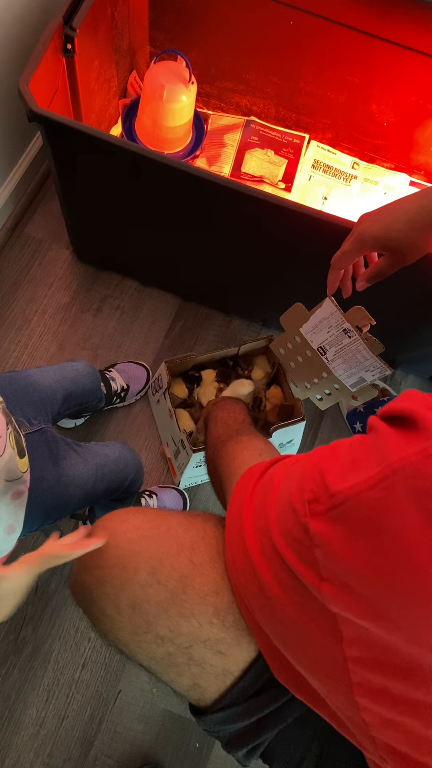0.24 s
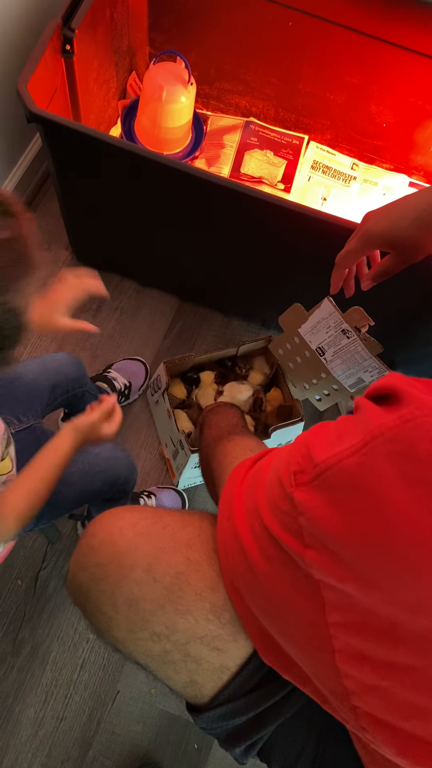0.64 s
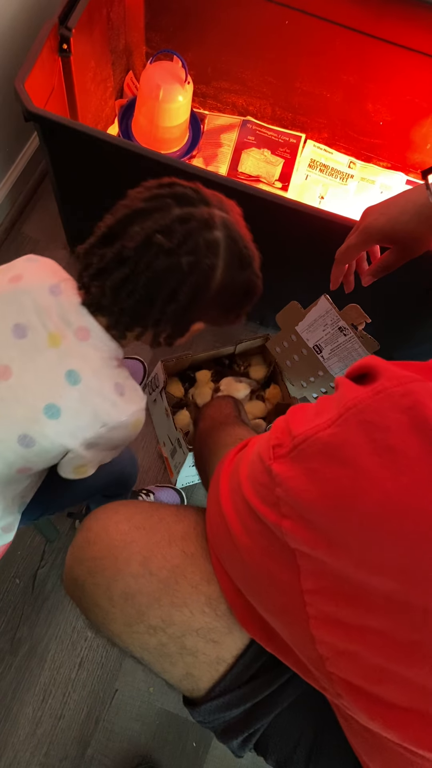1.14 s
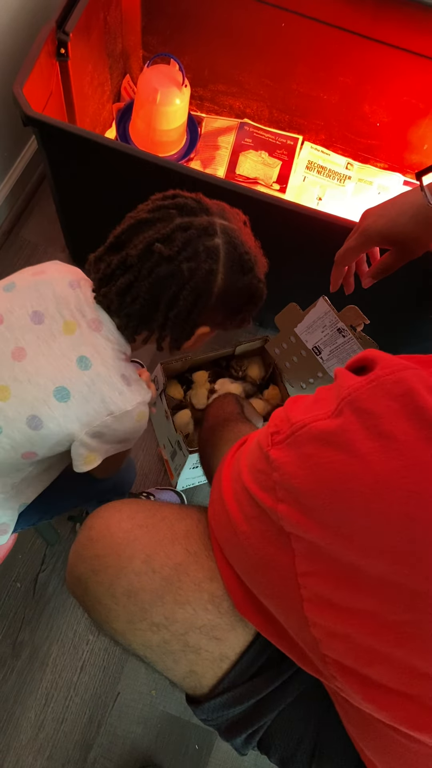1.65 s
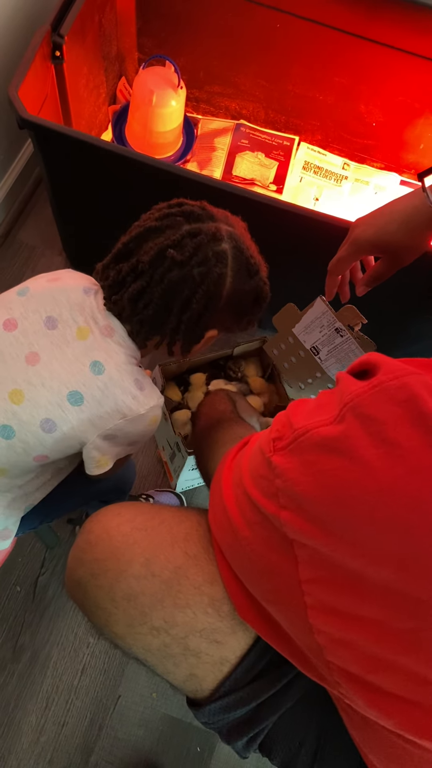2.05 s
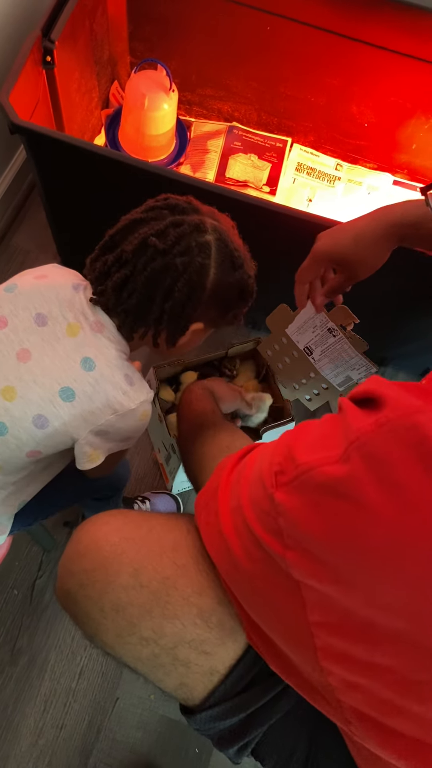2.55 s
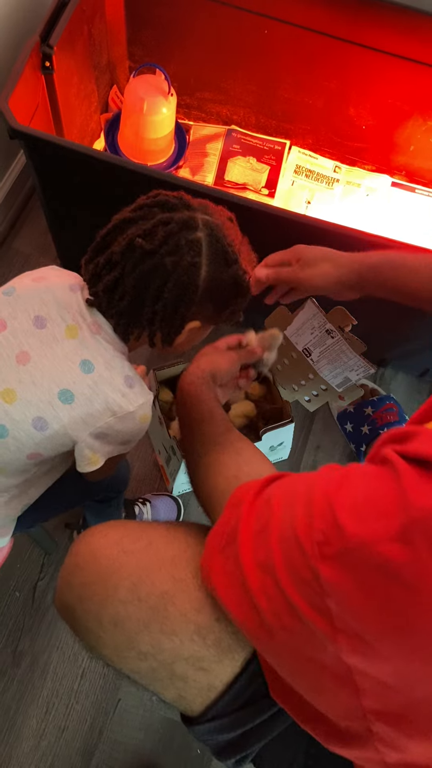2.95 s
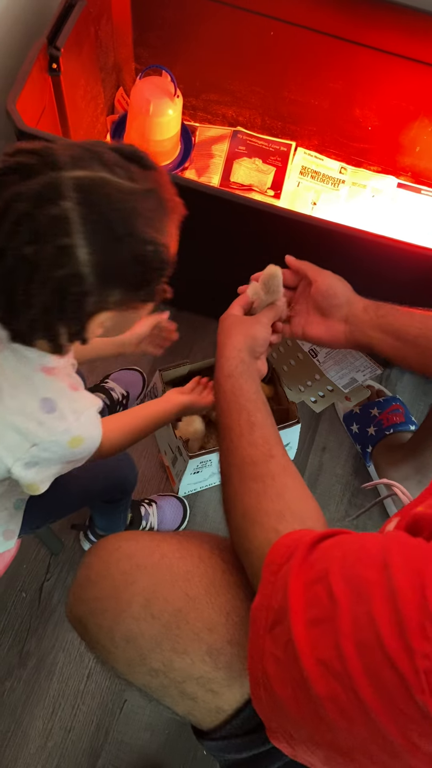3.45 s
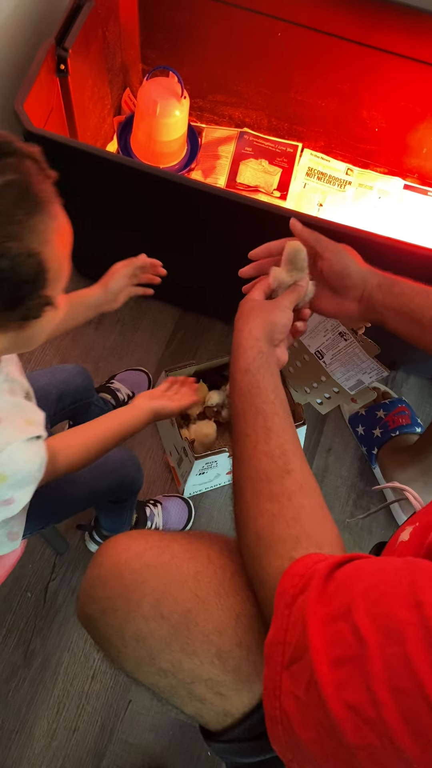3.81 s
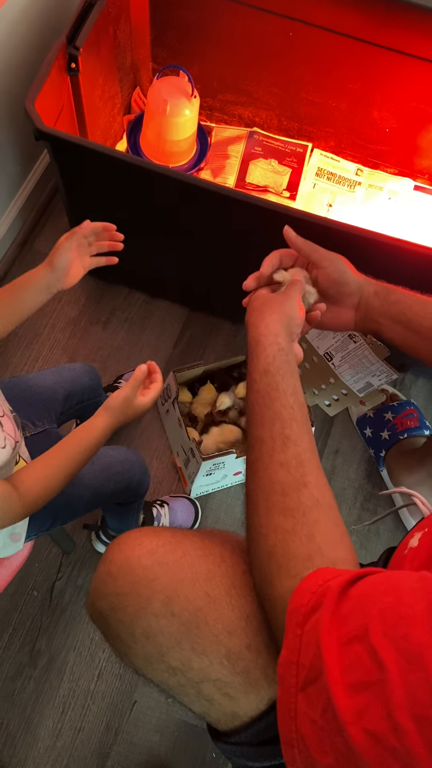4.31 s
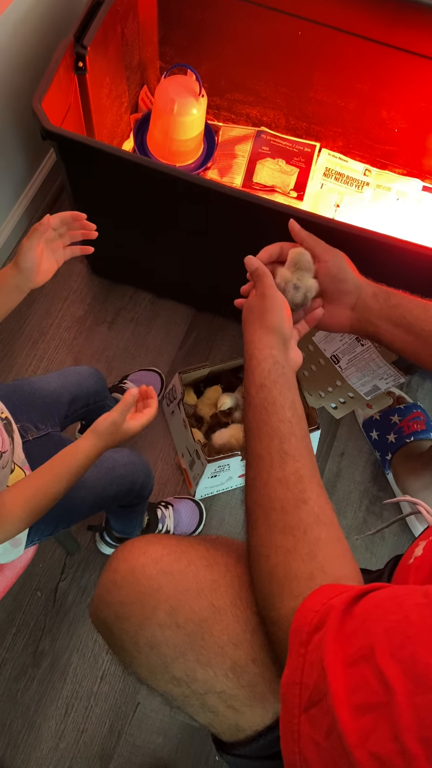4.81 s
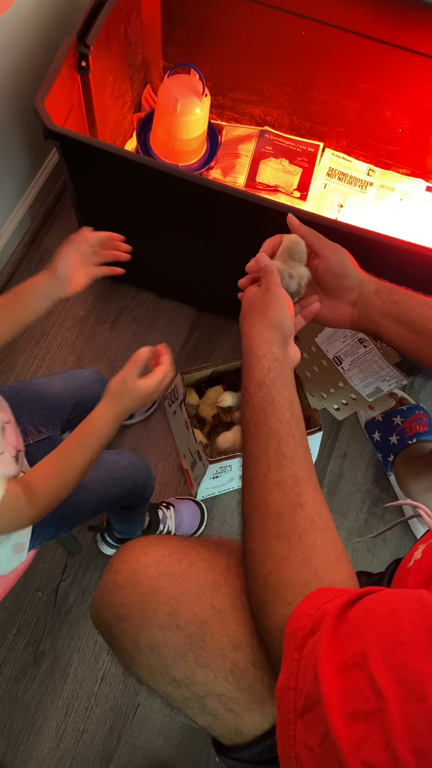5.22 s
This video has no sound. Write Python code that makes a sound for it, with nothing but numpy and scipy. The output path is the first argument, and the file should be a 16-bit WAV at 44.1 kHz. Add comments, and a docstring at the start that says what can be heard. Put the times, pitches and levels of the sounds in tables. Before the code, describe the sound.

Close, shrill chick cheeps slide downward over softer overlapping peeps, with cardboard knocks, rustling bedding and low floor bumps in a small room.

```python
"""Day-old chicks peep in a cardboard box in a small room; one cries loudest, with another close behind it.
Each peep is a nearly pure whistle sliding down; the cries first arch, then break into a reedy low voice.
Echoes of the box and a noise tail of the room surround the chicks. Shaped noise makes a rummaging hand,
crackling bedding, knocks, claw ticks, shifting weight and moving air; sine waves make an appliance's faint hum."""
import sys
import numpy as np
from scipy import signal
from scipy.fft import rfft, irfft, next_fast_len
from scipy.io import wavfile

SR = 44100
rng = np.random.default_rng(int(sys.argv[2]) if len(sys.argv) > 2 else 0)


def int16_out(signal):
    """Quantize to a 16-bit WAV file."""
    q = np.round(np.clip(np.atleast_2d(signal).T, -1, 1) * 32767)
    wavfile.write(sys.argv[1], SR, q.astype(np.int16))


N = 241182
TIME = np.arange(N) / SR


def from_db(db):
    """Turn decibels into a gain."""
    return 10 ** (np.asarray(db) / 20)


def rms_one(x):
    """Scale to unit power."""
    return x / np.sqrt(np.mean(x ** 2) + 1e-20)


def coloured(x, spectrum):
    """Filter by a curve of (f/Hz, level/dB) points joined along a logarithmic pitch axis."""
    hz, db = np.transpose(spectrum)
    # spare room at the end keeps the filter's ringing from wrapping round to the start
    size = next_fast_len(N + 8192)
    bins = np.maximum(np.fft.rfftfreq(size, 1 / SR), 1)
    gain = from_db(np.interp(np.log(bins), np.log(hz), db))
    return irfft(rfft(x, size) * gain, size)[..., :N]


def noise(spectrum, side_db):
    """Stereo noise of a given colour and unit power; a higher side level sounds wider."""
    mid, side = rng.standard_normal((2, N))
    left_right = mid + from_db(side_db) * side * [[1], [-1]]
    return rms_one(coloured(left_right, spectrum))


def waver(t, rate):
    """Random motion: straight lines between normal random points, rate of them per second."""
    knots = rng.standard_normal(1024)
    return np.interp((t - t[0]) * rate, np.arange(len(knots)), knots)


def progress(t, start_s, length_s):
    """Go from 0 to 1 over a stretch of time."""
    return np.clip((t - start_s) / length_s, 0, 1)


def swell(middle_s, length_s):
    """A bell-shaped rise and fall of gain."""
    return np.exp(-(2 * (TIME - middle_s) / length_s) ** 2)


def add(track, start_s, sound):
    """Mix a sound in at its time."""
    at = int(np.clip(start_s * SR, 0, N))
    track[at:at + len(sound)] += sound[:N - at]


def still_room(air_db=-64):
    """Moving air is soft noise; the appliance hum is a few sine waves with unsteady phase."""
    # colour of the air: f/Hz, level/dB per Hz
    air_colour = [(30, -10), (100, -1), (300, 0), (600, -11.5), (1200, -41.5), (3000, -18.5), (10000, -56),
                  (15000, -49.5)]
    # tones of the hum: f/Hz, level/dB rms
    hum_tones = [(293, -78), (335.4, -64.5), (473, -79)]
    hum = np.zeros(N)
    for hz, db in hum_tones:
        phase = 2 * np.pi * hz * TIME + 0.58 * waver(TIME, 6.6)
        hum += from_db(db) * np.sqrt(2) * np.sin(phase)
    return hum + from_db(air_db) * noise(air_colour, side_db=-4.0)


def bedding(trim_db=-1.0, grain_db=4.5):
    """Many small feet keep bedding and cardboard crackling: noise with fast random loudness."""
    # loudness before the trim: t/s, level/dB
    crackle_level = [(0, -69.5), (.55, -87), (.9, -73.5), (1.8, -72.5), (2.1, -62), (2.4, -63), (2.55, -82),
                     (3.0, -63), (3.5, -75.5), (3.82, -61.5), (3.97, -77), (4.5, -108), (5.1, -76),
                     (5.47, -60.5)]
    # colour: f/Hz, level/dB per Hz
    crackle_colour = [(1000, -24), (3000, 7.5), (9000, -2.5), (12000, -2), (15000, -11)]
    db = np.interp(TIME, *np.transpose(crackle_level)) + trim_db
    grain = grain_db * waver(TIME, 110)
    return from_db(db + grain) * noise(crackle_colour, side_db=-2.5)


def movement(grain_db=4.0, lump_db=2.5):
    """The floor booms under shifting weight; a hand brushes cardboard, which sticks and slips."""
    # weight shifting on the floor, as its rumble: t/s, level/dB
    shifting = [(0, -64.5), (.68, -65), (.75, -43), (.97, -51.5), (1.07, -51.5), (1.45, -56.5), (1.54, -47),
                (1.87, -57), (2.04, -37.5), (2.14, -46), (2.5, -54), (3.2, -59), (3.48, -69), (3.6, -59.5),
                (3.95, -63), (4.69, -66.5), (4.77, -51.5), (5.01, -49), (5.2, -52.5), (5.47, -52)]
    # strokes of the hand: middle t/s, length/s, hollow body level/dB, scrape level/dB
    strokes = [(0.412, 0.11, -63.5, -59.5), (1.124, 0.082, -49.5, -57.5), (1.473, 0.061, -51, -59.5),
               (1.627, 0.22, -48.5, -62.5), (1.755, 0.082, -63, -47.5), (1.846, 0.07, -58, -49.5),
               (2.18, 0.1, -74, -58.5), (2.419, .04, -71.5, -58), (2.875, .06, -59, -77),
               (3.05, 0.3, -79, -59.5), (3.741, 0.029, -70, -57), (3.848, 0.093, -72, -56.5),
               (4.728, 0.038, -56.5, -81), (4.852, 0.068, -51, -69), (5.266, 0.17, -62, -57.5),
               (5.333, 0.063, -48, -82), (5.46, .06, -70, -56.5)]
    # colours of floor rumble, dull shuffle and bright scrape: f/Hz, level/dB per Hz
    rumble_colour = [(20, -15), (35, -14.5), (48, -2.5), (59, 7.5), (80, -7), (120, -16.5), (250, -68)]
    shuffle_colour = [(70, -0.5), (130, 9.5), (300, 7.5), (450, -2), (700, -11), (1200, -71)]
    scrape_colour = [(350, -12.5), (750, 1), (1050, -5), (1500, -8), (2200, -13), (6000, 2.5),
                     (10000, -38.5), (15000, -17)]
    rumble_db = np.interp(TIME, *np.transpose(shifting))
    # clothes and box follow part of the rumble's rise and fall around -55 dB
    effort_db = rumble_db + 55
    shuffle = from_db(-62.5 + 0.41 * effort_db)
    scrape = from_db(-69 + 0.25 * effort_db)
    for middle_s, length_s, body_db, scrape_db in strokes:
        stroke = swell(middle_s, length_s)
        # add as powers, since the noises are random
        shuffle = np.hypot(shuffle, from_db(body_db) * stroke)
        scrape = np.hypot(scrape, from_db(scrape_db) * stroke)
    slips = from_db(grain_db * waver(TIME, 140))
    lumps = from_db(lump_db * waver(TIME, 55))
    out = from_db(rumble_db) * noise(rumble_colour, side_db=-70.5)
    out += shuffle * lumps * noise(shuffle_colour, side_db=-25.0)
    return out + scrape * slips * noise(scrape_colour, side_db=3.0)


def rub(middle_s=2.634, length_s=0.24, level_db=-60.5):
    """Something slides briefly over hollow cardboard: noise around the cardboard's resonance."""
    # resonance: f/Hz, level/dB per Hz
    rub_colour = [(400, -32), (520, -6.5), (630, -4), (720, -12), (950, -51)]
    return from_db(level_db) * swell(middle_s, length_s) * noise(rub_colour, side_db=-1.5)


def knocks(attack_s=0.0023, boom_db=-2, thud_db=-7, boom_width_hz=45):
    """Each soft blow is a broad thud and a damped boom of cardboard or floorboard."""
    # blows: t/s, level/dB before the thud and boom shares, time to fade by 60 dB/s, boom f/Hz
    blows = [(0.641, -56, 0.41, 140), (.725, -61, 0.26, 109), (1.116, -48.5, 0.82, 164),
             (1.537, -53, 1, 322), (1.702, -43, 0.99, 315), (1.793, -37.5, 0.27, 264),
             (1.965, -52.5, 0.95, 174), (2.22, -52, 0.23, 145), (4.815, -60, 0.54, 205),
             (5.307, -43.5, 0.463, 173)]
    # colour of the thud: f/Hz, level/dB per Hz
    thud_colour = [(40, -15), (70, 8), (170, 15.5), (280, 6.5), (500, 3.5), (900, -64), (2000, -96),
                   (5000, -32)]
    thud = from_db(thud_db) * noise(thud_colour, side_db=-18.5)
    out = np.zeros((2, N))
    for start_s, db, t60, hz in blows:
        age = np.maximum(TIME - start_s, 0)
        resonance = signal.iirpeak(hz, hz / boom_width_hz, fs=SR)
        boom = from_db(boom_db) * rms_one(signal.lfilter(*resonance, rng.standard_normal(N)))
        envelope = from_db(db - 60 * age / t60) * np.minimum(age / attack_s, 1)
        out += envelope * (thud + boom)
    return out


def ticks(trim_db=-7, t60=0.0043):
    """Claws tick dryly on cardboard: tiny bright snaps of noise that die within milliseconds."""
    # snaps: t/s, level/dB before the trim and filter
    snaps = [(0.9745, -40), (1.703, -34), (1.7259, -36), (3.8028, -31.5), (4.9903, -37), (5.3377, -47)]
    out, t = np.zeros(N), TIME[:2048]
    for start_s, db in snaps:
        add(out, start_s, from_db(db + trim_db - 60 * t / t60) * rng.standard_normal(len(t)))
    keep_treble = signal.butter(2, 1500, "high", fs=SR, output="sos")
    return signal.sosfilt(keep_treble, out)


def whistle(hz, level_db, reed_db, rasp, attack_s=0.0043, release_s=0.0047, jitter=0.0028,
            flutter_db=2.5, reedy_hz=3560, reedy_width_hz=110, rasp_hz=500):
    """A near sine from the syrinx (a bird's voice organ) that turns reedy in the low register."""
    # multiple of the pitch, level/dB in the pure high register, level/dB in the reedy low one
    overtones = [(2, -36, -7), (3, -37.5, -31.5), (4, -64, -37.5)]
    t = TIME[:len(hz)]
    hz = hz * (1 + jitter * waver(t, 304.0))
    phase = 2 * np.pi * np.cumsum(hz) / SR
    # 0 well above reedy_hz, 1 well below it
    reedy = .5 + .5 * np.tanh((reedy_hz - hz) / (2 * reedy_width_hz))
    tone = np.sin(phase)
    for order, pure_db, reedy_db in overtones:
        overtone_db = reed_db + pure_db + reedy * (reedy_db - pure_db)
        # leave out what lies above the highest pitch the sample rate can hold
        tone = tone + from_db(overtone_db) * np.sin(order * phase) * (order * hz < SR / 2)
    # a strained membrane also flaps slowly, which puts faint side tones beside the whistle
    flap_hz = rasp_hz * (1 + 0.175 * waver(t, 397))
    tone *= 1 + rasp * np.sin(2 * np.pi * np.cumsum(flap_hz) / SR)
    gate = np.clip(t / attack_s, 0, 1) * np.clip((t[-1] - t) / release_s, 0, 1)
    loudness = np.sqrt(2) * from_db(level_db + flutter_db * waver(t, 148.9))
    return loudness * np.sin(gate * np.pi / 2) ** 2 * tone


def peep(length_s, first_hz, last_hz, db, bend, reed_db, crest_share=0.54, sag_db=6):
    """One soft downward whistle; with bend above 0 its pitch falls ever faster."""
    u = np.linspace(0, 1, int(length_s * SR))
    hz = first_hz + (last_hz - first_hz) * u * (1 - bend * (1 - u))
    # loudest part of the way down, weaker by sag_db half a length from there
    level_db = db - sag_db * (2 * (u - crest_share)) ** 2
    return whistle(hz, level_db, reed_db, rasp=0.016)


def flock(level_db=-63, base_hz=4200, base_length_s=0.16, last_share=.65, bend=0.98, reed_db=3, count=64):
    """Faint falling peeps from deep in the huddle, one at a random moment of each equal time slot."""
    out = np.zeros(N)
    slot_s = N / SR / count
    for k, (when, high, long) in enumerate(rng.random((count, 3))):
        hz = base_hz * (.82 + 0.65 * high)
        length_s = base_length_s * (.8 + .5 * long)
        add(out, (k + when) * slot_s, peep(length_s, hz, last_share * hz, level_db, bend, reed_db))
    return out


def peeps(reed_db=-6):
    """The nearer chicks of the flock give soft falling whistles among the cries."""
    # start t/s, length/s, first f/Hz, last f/Hz, level/dB, bend (0 = straight, 1 = starts level)
    soft_peeps = [(0.01, 0.097, 5120, 4030, -61.5, 0.66), (0.016, 0.043, 4890, 3370.0, -62, 0.5),
                  (0.149, 0.1, 5780, 4100, -55, 0.79), (0.163, 0.088, 4730, 3400, -62, 0.6),
                  (0.21, 0.092, 4710, 2830, -47.5, 0.67), (0.283, 0.14, 4234, 2875, -52.5, 1),
                  (0.605, 0.12, 5690, 3930, -51, 0.93), (0.633, 0.082, 4650.0, 2680, -53.5, 0.59),
                  (0.688, 0.088, 4480.0, 2378, -44, 0.49), (0.71, 0.07, 4480.0, 3140, -52, 0.8),
                  (0.953, 0.078, 5830, 4600.0, -51.5, 0.7), (1.014, 0.071, 4780.0, 2855, -42.5, 0.77),
                  (1.096, 0.068, 3650.0, 2890, -61.5, 0.6), (1.098, 0.11, 4576, 3010, -55, 0.43),
                  (1.172, 0.089, 5640, 4700, -58.0, 0.69), (1.249, 0.061, 5670, 4380.0, -52, 0.39),
                  (1.381, 0.039, 5620, 4336, -45.5, 0.13), (1.405, 0.094, 4605, 2995, -46.0, 1.0),
                  (1.488, 0.11, 3910, 2986, -57.5, 0.4), (1.547, 0.1086, 5050, 4178, -55.5, 0.93),
                  (1.608, 0.032, 3520.0, 2750, -50, 0.31), (1.621, 0.064, 4510, 2830.0, -48.5, 0.52),
                  (1.962, 0.12, 3875, 3410, -59, 0.3), (2.068, 0.079, 3596, 2380, -51, 0.89),
                  (2.099, 0.079, 4700.0, 4220, -60.5, 0.6), (2.37, 0.11, 4000, 2756, -52.5, 0.89),
                  (2.429, 0.044, 4500, 3150, -53.5, 0.5), (2.483, 0.079, 3570, 2240, -48, 0.85),
                  (2.492, 0.11, 4650.0, 3820, -56.5, 0.6), (2.82, 0.085, 3787, 2470, -48, 0.91),
                  (2.899, 0.077, 4280.0, 2600.0, -56.5, 0.6), (2.939, 0.045, 4510, 2880, -49.5, 1),
                  (3.038, 0.027, 4270, 3630.0, -49, 0.6), (3.152, 0.11, 3730, 2750.0, -48.5, 0.7),
                  (3.239, 0.048, 4380.0, 2690, -53.0, 0.48), (3.279, 0.066, 4140, 2729, -59.5, 0.71),
                  (3.404, 0.037, 3450.0, 2540, -54, 0.7), (3.519, 0.069, 3912, 2390, -46.5, 0.747),
                  (3.622, 0.0783, 4175, 2540.0, -46, 0.27), (3.67, 0.069, 3569, 2400.0, -47.5, 0.66),
                  (3.937, 0.043, 3480.0, 2455, -47, 0.6), (3.979, 0.081, 4380.0, 2830.0, -54.0, 0.85),
                  (4.09, 0.062, 3564, 2305, -48.5, 0.53), (4.126, 0.064, 3760, 3200, -52, 0.6),
                  (4.185, 0.052, 4180, 2790, -46.5, 0.6), (4.391, 0.11, 4410, 2860, -59, 0.5),
                  (4.458, 0.097, 4440, 2900, -53, 0.79), (4.69, 0.059, 3860, 2590, -43.5, 0.502),
                  (4.737, 0.083, 4340, 3170, -51, 0.9), (4.829, 0.06, 4070, 2680, -58, 0.82),
                  (4.941, 0.051, 3780, 2240.0, -47, 0.94), (5.098, 0.056, 4075, 2487, -42, 0.4),
                  (5.157, 0.046, 3950.0, 2910, -51, 1)]
    out = np.zeros(N)
    for start_s, length_s, first_hz, last_hz, db, bend in soft_peeps:
        add(out, start_s, peep(length_s, first_hz, last_hz, db, bend, reed_db))
    return out


def cries(rasp=0.14):
    """Each distress cheep swells over an arch of pitch, breaks into the low register and fades sliding down."""
    # start t/s, arch length/s, fall length/s, top f/Hz, f/Hz before the break, f/Hz after it, last f/Hz,
    # arch level/dB, fall level/dB, overtone boost/dB, rising share of the arch (0-1),
    # curvature of the fall (1 = straight, 4 = held before it sinks)
    cheeps = [(0.014, 0.096, 0.068, 4304, 3610, 3396, 2040, -57.5, -39.0, -3.5, 0.31, 1.37),
              (0.331, 0.12, 0.068, 4584, 3940.0, 3335, 2170, -36.5, -35.5, 1.0, 0.24, 1.67),
              (0.385, 0.062, 0.041, 4490.0, 3820.0, 2940, 1880, -40.5, -45.5, 11, 0.32, 1.27),
              (0.755, 0.11, 0.064, 4565, 4074, 3313, 2190, -36, -38.5, 3.5, 0.39, 1.57),
              (0.811, 0.11, 0.051, 4785, 4040, 3040, 2010, -36.5, -42.5, 5.5, 0.35, 1.23),
              (1.203, 0.087, 0.06, 4590, 4015, 3390, 2208, -45, -41, 7.5, 0.35, 1.95),
              (1.213, 0.11, 0.059, 4855, 4050, 3030.0, 2090, -35.5, -43.5, 8.5, 0.32, 1.54),
              (1.656, 0.087, 0.061, 4860.0, 4250, 3435, 2315, -41, -36, 2.5, 0.36, 1.65),
              (1.66, 0.141, 0.049, 4737, 4006, 2973, 2040, -37.5, -42.5, 0, 0.17, 1.5),
              (2.086, 0.12, 0.05, 4240, 3760.0, 3370, 1990, -49.5, -39, -5, 0.22, 0.99),
              (2.197, 0.097, 0.053, 4616, 3900, 3650, 2040, -38, -37.5, 5, 0.26, 1.23),
              (2.492, 0.085, 0.055, 4120.0, 3890, 3540.0, 2020, -45.5, -38, -7, 0.35, 1.03),
              (2.573, 0.108, 0.068, 4900, 4100, 3308, 2160, -29.5, -32, 7.0, 0.67, 3.65),
              (2.851, 0.15, 0.052, 4494, 3920, 3535, 1824, -46.5, -36, -18, 0.42, 1.1),
              (2.987, 0.11, 0.06, 4865, 4060.0, 3380, 2100, -27.5, -29.0, 5.5, 0.54, 1.93),
              (3.281, 0.097, 0.06, 4705, 4055, 2960, 2086, -35, -35.0, 2.5, 0.32, 1.31),
              (3.335, 0.12, 0.049, 4972, 4040, 3633, 2243, -28, -24.0, 1, 0.31, 1.6),
              (3.695, 0.11, 0.048, 4646, 3790, 2917, 2010, -39, -34.5, 0, 0.24, 1.56),
              (3.779, 0.097, 0.045, 4906, 4150, 3714, 2143, -30.5, -25, 3.5, 0.36, 1.2),
              (4.131, 0.11, 0.054, 4640, 3840, 2910, 2010, -36, -38.5, 6, 0.23, 1.5),
              (4.174, 0.12, 0.043, 4700, 3920, 3290.0, 2076, -27.5, -31, 5, 0.43, 1.24),
              (4.54, 0.079, 0.065, 4156, 3730.0, 3800, 2120.0, -44, -33, -3.5, 0.45, 1.42),
              (4.515, 0.12, 0.045, 4600.0, 3867, 3230.0, 2220, -27, -26.0, 1, 0.35, 1.46),
              (4.878, 0.11, 0.063, 4460.0, 4037, 3584, 2005, -28.5, -30, -2, 0.26, 1.25),
              (4.927, 0.082, 0.069, 4247, 3943, 3195, 2020, -33.5, -37.0, 1.5, 0.3, 1.7),
              (5.231, 0.11, 0.059, 4448, 3945, 3487, 2070, -29.0, -29, -2.5, 0.45, 1.14),
              (5.312, 0.095, 0.062, 4436, 3910, 2930.0, 2010, -35.5, -40.5, 2, 0.4, 1.17)]
    rise_share, descent_power = .085, 2.2  # part of the top pitch gained while rising; bend of the descent
    drop_s, break_lift_db = .008, 0.5  # at the break the pitch drops quickly and the level lifts a little
    swell_db, swell_power = 18.5, 1.83  # loudness gained through the arch
    fade_db, fade_power = 23.5, 2.38  # loudness lost in the fall
    out = np.zeros(N)
    for (start_s, arch_s, fall_s, top_hz, break_hz, low_hz, last_hz,
         arch_db, fall_db, reed_db, rising, curvature) in cheeps:
        t = TIME[:int((arch_s + fall_s) * SR)]
        crest_s = rising * arch_s
        arch = progress(t, 0, arch_s)
        rise = progress(t, 0, crest_s)
        descent = progress(t, crest_s, arch_s - crest_s)
        drop = progress(t, arch_s, drop_s)
        fall = progress(t, arch_s + drop_s, fall_s - drop_s)

        hz = top_hz * (1 - rise_share * (1 - rise) ** 2)
        hz -= (top_hz - break_hz) * descent ** descent_power
        hz -= (break_hz - low_hz) * drop
        hz -= (low_hz - last_hz) * fall ** curvature

        db = arch_db - swell_db * (1 - arch) ** swell_power
        db += (fall_db - arch_db) * drop - fade_db * fall ** fade_power
        db += break_lift_db * np.sin(np.pi * drop)
        add(out, start_s, whistle(hz, db, reed_db, rasp))
    return out


def room(x, box_db, room_db, left_lead_s, build_s=0.011, room_t60=0.33, likeness=0.19):
    """Direct sound, a few quick echoes off box and floor, then the room's tail as fading noise."""
    # echoes: delay/s, level/dB before box_db, lead of the left channel/s (below 0 the right leads;
    # an arrival that would come before the start of the response is not heard)
    echo_paths = [(.0014, -12.5, .00003), (.0036, -4.5, -0.0087), (.0049, -13.5, .00008),
                  (.0078, -3.5, .00002), (0.0106, -13, 0.005)]
    # the room swallows treble: f/Hz, level/dB
    tail_colour = [(2000, -3.5), (3000, -0.5), (4500, -0.5), (6000, -2.5), (10000, -9.5)]
    t = TIME[:SR * 3 // 4]
    # left and right tails share part of their noise
    shared = np.sqrt(likeness) * rng.standard_normal(len(t))
    tail = shared + np.sqrt(1 - likeness) * rng.standard_normal((2, len(t)))
    fade = from_db(-60 * t / room_t60) * np.clip(t / build_s - .5, 0, 1)
    response = from_db(room_db) * coloured(tail, tail_colour)[:, :len(t)] * fade / np.sqrt(np.sum(fade ** 2))
    # the direct sound comes first
    paths = [(0.000041, 0.0076, left_lead_s)]
    paths += [(delay, db + box_db, lead) for delay, db, lead in echo_paths]
    for delay, db, lead in paths:
        # a short pulse that may fall between two samples; 12 samples leave room for its rise
        offset = (t - delay - np.array([[0], [lead]])) * SR - 12
        response += from_db(db) * np.sinc(offset) * np.exp(-(offset / 6) ** 2)
    return signal.fftconvolve(x[None], response, axes=1)[:, :N]


def scene():
    """The chicks sit a little to the right; the flock is deeper in the box than the criers."""
    # the soft peeps have brighter upper overtones: f/Hz, level/dB
    beak_colour = [(5000, 1.5), (6500, -1.5), (8500, 3), (10000, 4), (12500, 16)]
    soft = coloured(peeps() + flock(), beak_colour)
    near = room(cries(), box_db=-4, room_db=-7.5, left_lead_s=.000038) * from_db([[-.9], [.9]])
    huddle = room(soft + ticks(), box_db=-3.5, room_db=-7.5, left_lead_s=.000025) * from_db([[-.6], [.6]])
    return near + huddle + knocks() + rub() + bedding() + movement() + still_room()


def record(dry):
    """The microphone has two dips in the treble; a steep filter removes the very top."""
    # microphone response: f/Hz, level/dB
    microphone = [(20, -2.5), (4800, 0.5), (6400, -7), (6850, -19), (7100, -26.5), (7600, -13), (8100, 2.5),
                  (9000, 3.5), (11000, 4.5), (12300, -1), (13200, -35), (14200, -44), (15000, -11)]
    # run forwards and backwards, so nothing is delayed; fully cut from 16200 Hz
    cut_top = signal.cheby2(14, 50, 16200, fs=SR, output="sos")
    return signal.sosfiltfilt(cut_top, coloured(dry, microphone))


dry = scene()
out = record(dry)
int16_out(out)
```